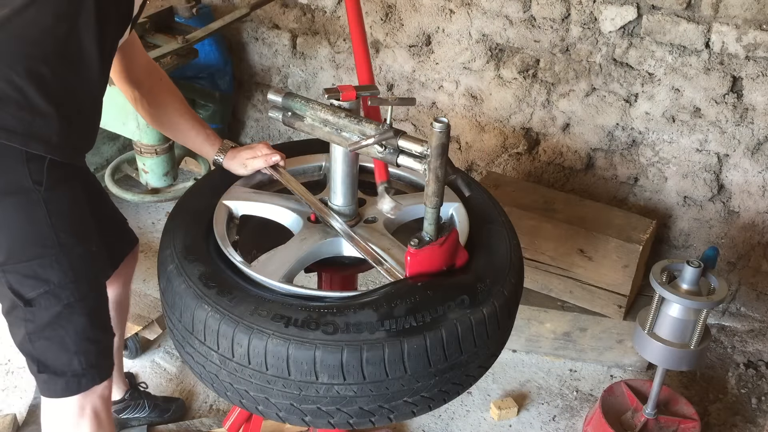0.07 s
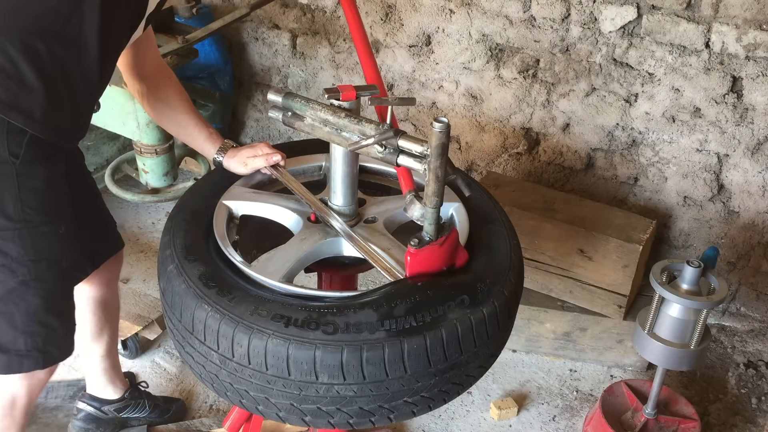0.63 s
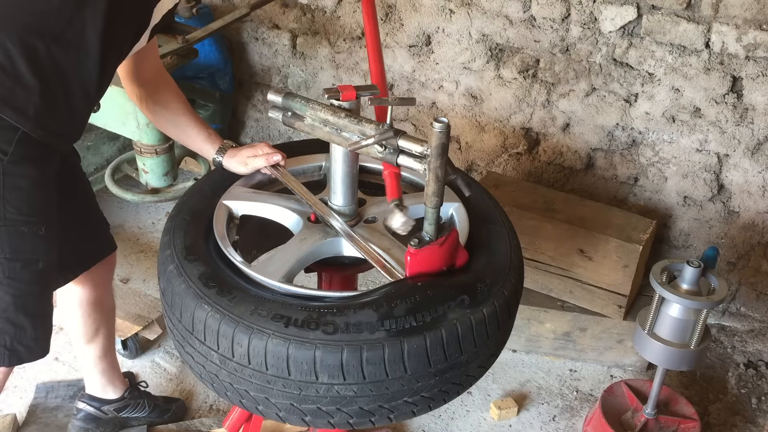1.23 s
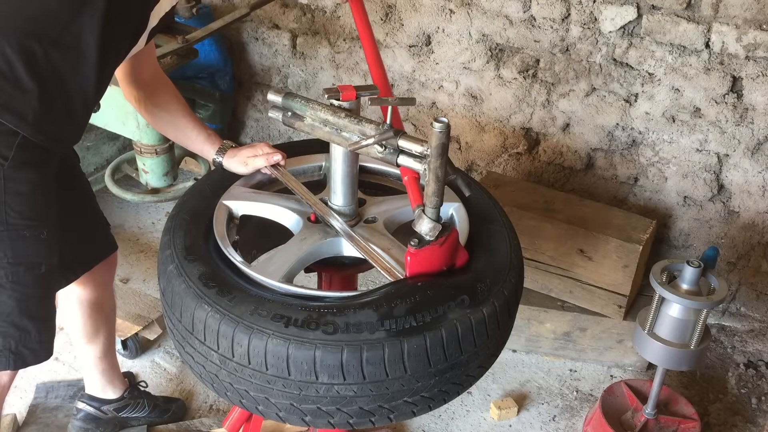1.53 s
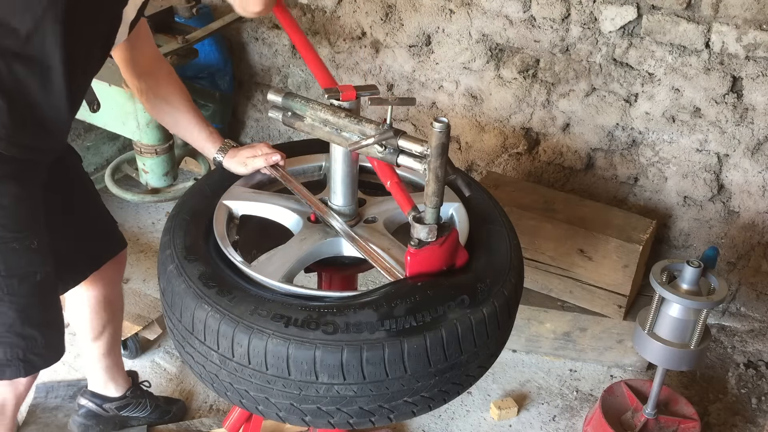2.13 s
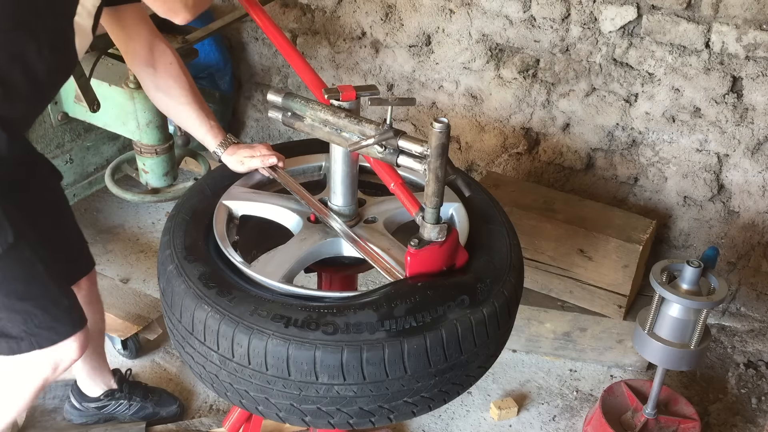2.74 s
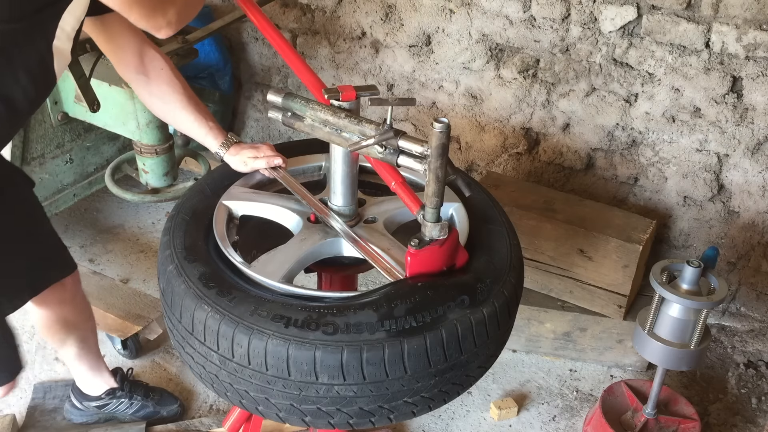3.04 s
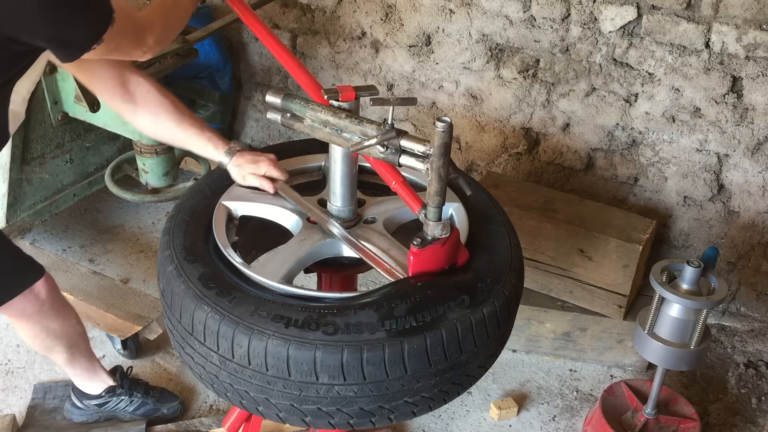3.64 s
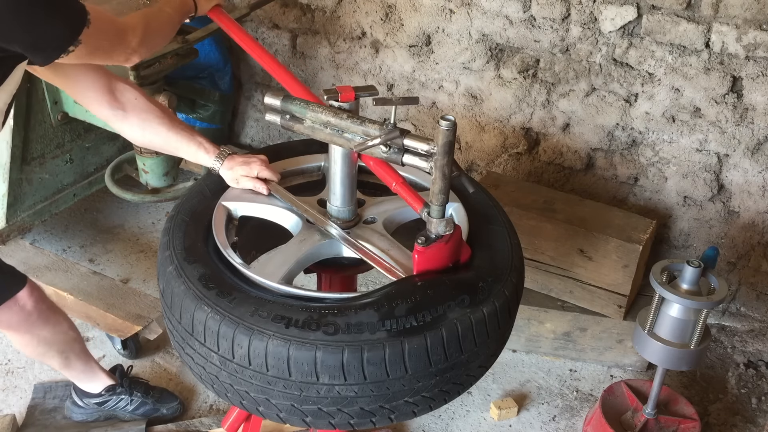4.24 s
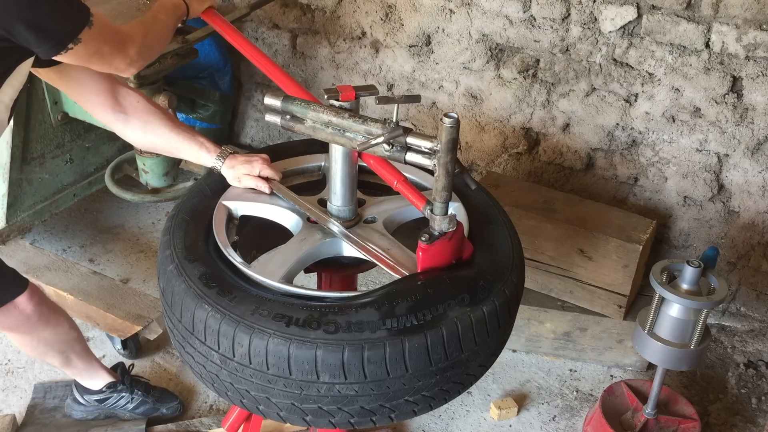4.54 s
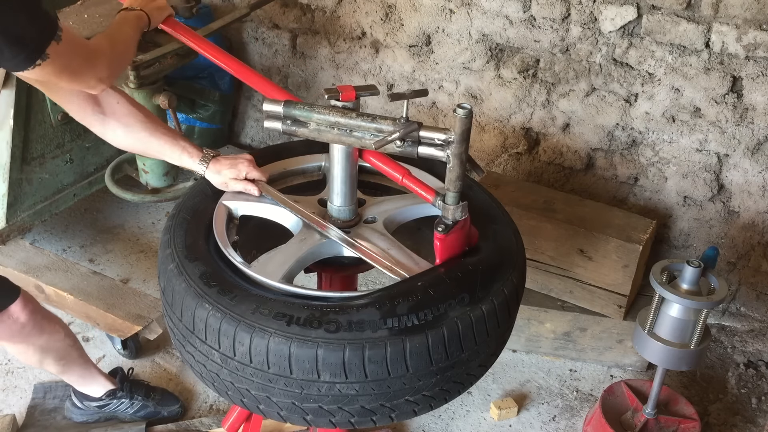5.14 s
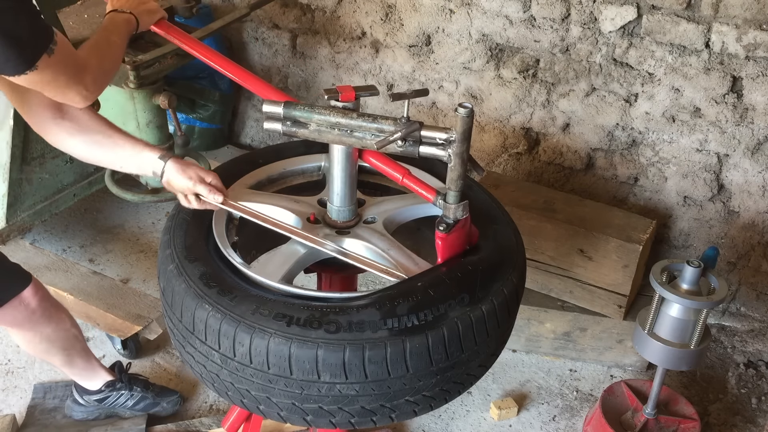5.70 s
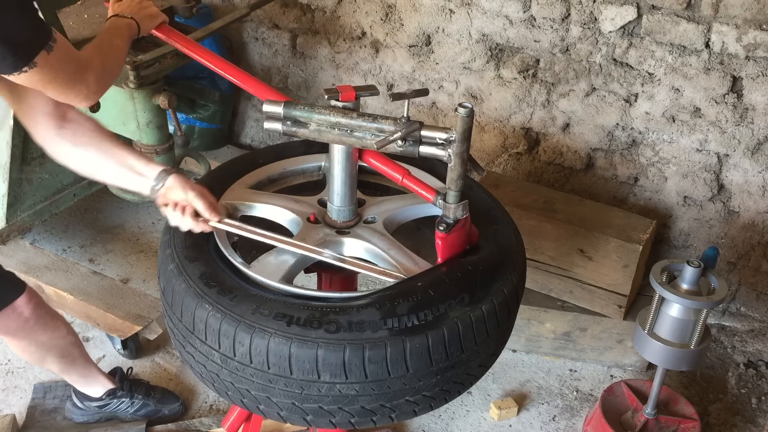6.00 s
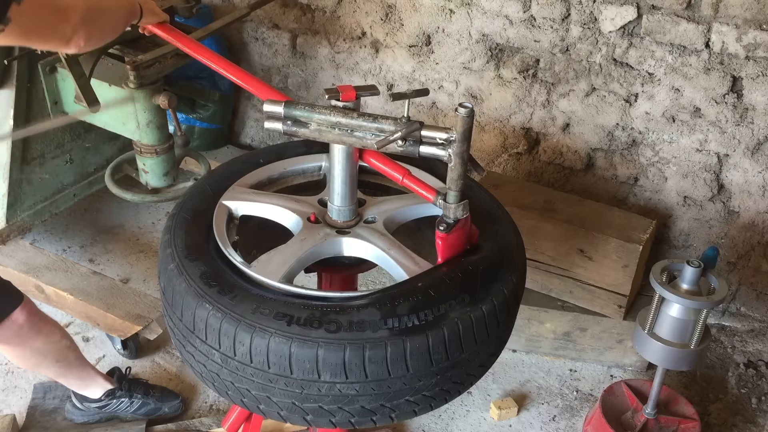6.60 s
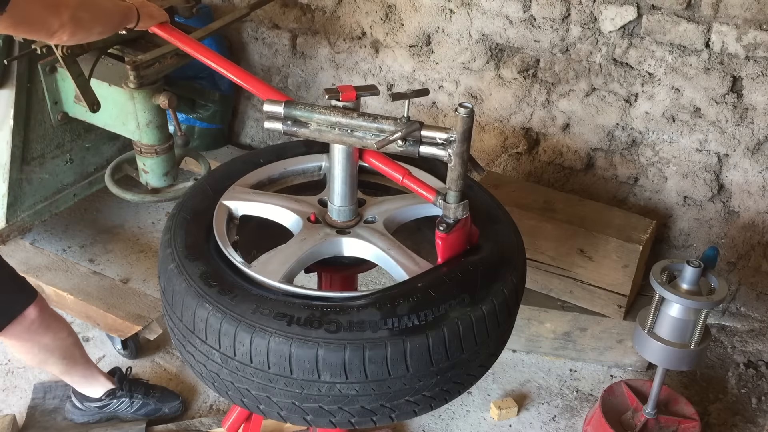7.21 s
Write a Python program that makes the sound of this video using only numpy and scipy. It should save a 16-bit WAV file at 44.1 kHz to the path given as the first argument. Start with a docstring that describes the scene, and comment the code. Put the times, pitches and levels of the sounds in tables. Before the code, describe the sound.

In a small workshop, a tire is pried off its rim by hand. Irregular metal knocks and clanks from the changer's lever come first, mixed with short scuffs, light rustling and a brief squeak. A loud ringing hit on the wheel follows about five seconds in, then a lighter tap and a final clink of the tire iron. Underneath, a far engine hums low and small birds chirp quietly.

```python
"""Levering a tyre off its rim

In a small stone workshop, the lever of a manual tyre changer rings and knocks in its loose frame.
Stretched rubber creaks, steel squeaks, and the bead snaps over the alloy rim. The tyre iron taps the
wheel and is put down with a clink. Shoes scuff in between; outside, birds chirp and a far engine hums."""
import sys
import numpy as np
from scipy import signal
from scipy.fft import rfft, irfft
from scipy.io import wavfile
from scipy.ndimage import uniform_filter1d

SR = 44100
rng = np.random.default_rng(int(sys.argv[2]) if len(sys.argv) > 2 else 0)


def master(y):
    """Save y as 16-bit WAV."""
    cut = np.clip(np.atleast_2d(y).T, -1, 1)
    pcm = np.round(cut * 32767)  # scale
    wavfile.write(sys.argv[1], SR, pcm.astype(np.int16))


N = 324708
TIME = np.arange(N) / SR


def undb(db):
    """Decibels to gain."""
    return 10 ** (np.asarray(db) / 20)


def unit(x):
    """Scale to rms 1."""
    return x / np.sqrt(np.mean(x ** 2) + 1e-20)


def add(out, start_s, x):
    """Mix a sound in at its cue."""
    i = max(int(start_s * SR), 0)
    out[i:i + len(x)] += x[:N - i]


def decay(t, t60):
    """An envelope that falls 60 dB in t60 seconds."""
    return np.exp(-np.log(1000) * t / t60)


def drift(rate_hz, size=N):
    """Smooth random modulation with a spread near 1."""
    hold = max(int(SR / rate_hz), 1)
    steps = np.repeat(rng.standard_normal(size // hold + 1), hold)
    return unit(uniform_filter1d(uniform_filter1d(steps, hold), hold))[:size]


def curve_at(points, hz):
    """Read (f/Hz, value) points on a log-frequency axis."""
    f, value = np.transpose(points)
    return np.interp(np.log(np.maximum(hz, 1)), np.log(f), value)


def eq(x, points, size=4096):
    """Minimum-phase EQ through (f/Hz, gain/dB) points."""
    cepstrum = irfft(np.log(undb(curve_at(points, np.fft.rfftfreq(size, 1 / SR)))))
    cepstrum[1:size // 2] *= 2
    cepstrum[size // 2 + 1:] = 0
    return signal.fftconvolve(x, irfft(np.exp(rfft(cepstrum))))[:len(x)]


def balance_bands(x, edges, balance_db, level_db, tilt_db, span_s, size=8192):
    """EQ a sound's opening towards a band balance, raised by level_db and tilted by tilt_db an octave."""
    octave = np.log2(np.multiply(edges[:-1], edges[1:])) / 2
    target_db = level_db + np.asarray(balance_db) + tilt_db * (octave - np.median(octave))
    span, hz = int(span_s * SR), np.fft.rfftfreq(size, 1 / SR)
    bands = list(zip(edges, edges[1:]))
    plateaus = np.ravel([(1.2 * lo, hi / 1.2) for lo, hi in bands])
    fade = np.minimum(1, np.linspace(10, 0, span))
    for _ in range(2):
        power = 2 * np.abs(rfft(x[:span] * fade, size)) ** 2 / (size * span)
        band_db = [10 * np.log10(power[(hz >= lo) & (hz < hi)].sum() + 1e-20) for lo, hi in bands]
        x = eq(x, np.column_stack([plateaus, np.repeat(target_db - band_db, 2)]))
    return x


def grit(per_s, spread_db, size):
    """Random clicks, a few of them much larger than the rest."""
    clicks = (rng.random(size) < per_s / SR) * rng.choice([-1, 1], size)
    return clicks * undb(spread_db * np.minimum(rng.exponential(size=size), 4))


def contact_colour(x, count=70, spread_db=3.5):
    """Each contact point favours some of the broad, quickly damped resonances."""
    hz = np.geomspace(400, 15000, count)
    return eq(x, np.column_stack([hz, spread_db * rng.standard_normal(count)]))


def struck_spot(x, spot_hz, lift_db=6, octaves=0.49):
    """The point of contact lifts its own register."""
    span = 2 ** octaves
    return eq(x, [(spot_hz / span, 0), (spot_hz, lift_db), (spot_hz * span, 0)])


# Reverb time of the workshop: f/Hz, t60/s
ROOM_DECAY = [(70, 0.56), (200, 0.49), (600, 0.34), (2000, 0.28), (5000, .23), (14000, 0.16)]

def diffuse_tail(patchy_db=4, size=24000, bands=9):
    """Diffuse ringing of the steel and the stone room, in many narrow peaks; the treble dies first."""
    t = np.arange(size) / SR
    octave = np.log2(np.fft.rfftfreq(size, 1 / SR) / 50 + 1e-9)  # above 50 Hz
    peaks = undb(patchy_db * unit(uniform_filter1d(rng.standard_normal(len(octave)), 24)))
    spectrum = unit(peaks) * rfft(rng.standard_normal(size))
    out = np.zeros(size)
    for k in range(bands):
        band = np.maximum(0, 1 - np.abs(np.clip(octave, 0, bands - 1) - k))
        out += irfft(spectrum * band) * decay(t, curve_at(ROOM_DECAY, 50 * 2 ** k))
    return out


def in_room(x, wet_db):
    """A sound with its reflections from the walls."""
    walls = diffuse_tail()
    return x + undb(wet_db) * signal.fftconvolve(x, walls / np.linalg.norm(walls))[:len(x)]


# EQ of the outdoor bed: f/Hz, gain/dB
AIR_EQ = [(20, -24), (40, -14), (70, 12), (120, -7), (200, -2.5), (450, -15.5), (750, -15.5), (1100, -15.5),
          (1700, -18.5), (3000, -24.5), (4200, -25), (6000, -31), (15000, -41.5)]

def outdoor_air(level_db=-58.5):
    """A soft, nearly steady bed of outdoor noise."""
    swell_db = .8 * drift(7)
    return unit(eq(rng.standard_normal(N), AIR_EQ)) * undb(level_db + swell_db)


def drone(pitch_hz=39, sag_hz_per_s=.7, level_db=-55, peak_s=6.7, width_s=2.2):
    """A deep far-off tone swells and fades as its pitch sags."""
    from_peak = TIME - peak_s
    phase = 2 * np.pi * np.cumsum(pitch_hz - sag_hz_per_s * from_peak) / SR
    swell = np.exp(-(from_peak / width_s) ** 2)
    return undb(level_db + 1.2 * drift(5.4)) * swell * np.sqrt(2) * np.sin(phase)


# The engine picks up and draws nearer: t/s, firing rate/Hz, level/dB
ENGINE_MOVES = [(0, 50.3, -66), (2.8, 52.7, -54), (4.6, 56.5, -49), (5.7, 54.02, -53), (6.9, 53.7, -43.5),
                (7.36, 54.5, -47.5)]

def distant_engine(rumble_db=-60, rumble_follow=0.5):
    """Only the firing tone, its octave and some rumble carry indoors."""
    times, rates, levels = np.transpose(ENGINE_MOVES)
    hz, db = np.interp(TIME, times, rates), np.interp(TIME, times, levels)
    phase = 2 * np.pi * np.cumsum(hz * (1 + 0.0077 * drift(4.3))) / SR
    octave = undb(-16 + 1.5 * drift(3)) * np.sin(2 * phase)
    tone = np.sqrt(2) * (np.sin(phase) + octave)
    rumble_eq = [(20, -37.5), (30, -18.5), (39, -7), (80, -2), (120, -10.5), (200, -26), (600, -58),
                 (3000, -82.5)]
    rumble = unit(eq(rng.standard_normal(N), rumble_eq))
    rumble *= undb(rumble_db + rumble_follow * (db - db.mean()))
    return undb(db + 1.5 * drift(11)) * tone + rumble


def bird_calls(cues, semitones, trill_depth, trill_hz=110):
    """Trilled whistles of one kind, gliding through a start, a turn and an end pitch."""
    out = np.zeros(N)
    for start_s, length_s, pitch_hz, db in cues:
        progress = np.linspace(0, 1, int(length_s * SR))
        trill = np.sin(2 * np.pi * trill_hz * length_s * progress) + .5 * drift(450, len(progress))
        glide = 2 ** (np.interp(progress, [0, 0.38, 1], semitones) / 12)
        hz = pitch_hz * glide * (1 + trill_depth * trill)
        envelope = np.sqrt(2 * np.abs(np.sin(np.pi * progress)))
        add(out, start_s, undb(db) * envelope * np.sin(2 * np.pi * np.cumsum(hz) / SR))
    return out


# Bird cues, three kinds of call: t/s, length/s, f/Hz, relative level/dB
ARCHED_CHIRPS = [(1.13, 0.088, 4170, -64.5), (3.975, 0.096, 4450, -49), (5.415, .1, 4600, -50),
                 (6.86, 0.094, 4550, -65)]
RISING_CALLS = [(4.6, .06, 4920, -63.5), (5.651, 0.036, 4910, -57.5), (6.727, 0.049, 4860, -60),
                (6.816, 0.028, 4560, -61)]
THIN_WHISTLES = [(1.098, .03, 4320, -55.5), (1.839, 0.3, 7110, -71.5), (2.068, 0.017, 6760, -53),
                 (2.15, 0.077, 4320, -61), (2.878, 0.097, 4350, -65)]

def birds(echo_t60=0.42, direct_db=-9, trim_db=-2):
    """Small birds call outside, smeared by the walls."""
    calls = bird_calls(ARCHED_CHIRPS, [-1.4, .3, -7], trill_depth=0.0775, trill_hz=128.8)
    calls += bird_calls(RISING_CALLS, [-7.3, 0, 2.1], trill_depth=.025)
    calls += bird_calls(THIN_WHISTLES, [.2, 0, -0.3], trill_depth=0.021)
    echo = rng.standard_normal(SR) * decay(TIME[:SR], echo_t60)
    wet = signal.fftconvolve(calls, echo / np.linalg.norm(echo))[:N]
    return undb(trim_db) * (undb(direct_db) * calls + wet)


def handling(level_db=-59, strain_from_s=1.72, strain_to_s=5.03, rise_db_per_s=8, fall_db_per_s=4):
    """Clothes, hands and rubber tick and rustle, loudest while the bead is under strain."""
    ticks = sum(contact_colour(grit(per_s=24, spread_db=3.5, size=N)) for _ in range(4))
    rustle_eq = [(60, -6.5), (180, 5), (400, -1), (650, 0), (1000, 9), (2200, -4.5), (4000, -17),
                 (8000, -26.5), (15000, -26.5)]
    rustle = eq(in_room(ticks, wet_db=6), rustle_eq)
    fade_in_db = rise_db_per_s * np.minimum(TIME - strain_from_s, 0)
    fade_out_db = fall_db_per_s * np.minimum(strain_to_s - TIME, 0)
    return unit(rustle) * undb(level_db + fade_in_db + fade_out_db)


# Band edges of rub, scrape and grit: f/Hz; their balance: level/dB
SCUFF_BANDS = [350, 1400, 5000, 15000]
SCUFF_MIX = [0.5, 0, -8]
# Scuff cues: t/s, length/s, level/dB, grittiness/(dB per octave), register/Hz
SCUFF_CUES = [(0.183, 0.047, -63, 1.5, 450), (0.368, 0.0078, -62, -4.5, 620),
              (0.722, 0.016, -46.5, -4, 620), (0.751, .028, -51.5, -0.5, 700),
              (0.864, 0.094, -49, -0.7, 640), (0.988, .012, -56.5, -1.5, 620), (1.01, 0.02, -48, -1.5, 640),
              (2.076, 0.014, -73, 11.5, 7100), (2.22, 0.065, -49.5, -2, 553), (2.296, 0.18, -46, 0.8, 1200),
              (2.454, 0.23, -54, 2.4, 1200), (2.839, 0.064, -54, 1.5, 1900), (2.959, 0.089, -65.5, -6, 900),
              (3.219, 0.072, -55, -1.5, 800), (3.35, 0.03, -49, -4, 1400), (3.747, 0.029, -62, -5, 640),
              (3.801, 0.19, -61, 1.2, 1000), (3.958, .04, -53.5, .5, 1570), (4.355, .05, -58.5, 0.2, 2100),
              (4.686, .056, -65, -0.5, 1500), (5.197, 0.069, -55.5, -0.4, 1410),
              (5.286, 0.042, -55.5, -2, 1390), (5.747, 0.18, -60, -0.5, 1200),
              (6.005, 0.15, -60.5, 6, 6340), (6.199, .055, -57.5, 0.5, 2100),
              (6.979, 0.077, -63.5, 0.9, 1200)]

def scuffs(attack_share=0.088, release_s=0.0017, catch_s=.004, size=14000):
    """Shoes on concrete and rubber on the rim catch, then slide over fine grains in uneven surges."""
    out, t = np.zeros(N), np.arange(size) / SR
    sole_eq = [(80, -24), (250, -4), (400, -2), (480, -3), (640, 4.5), (850, -6.5), (1600, -4),
               (2600, -6.5), (5000, -15), (9000, -23), (15000, -25.5)]
    for start_s, length_s, db, tilt_db, spot_hz in SCUFF_CUES:
        attack = 1 - np.exp(-t / (attack_share * length_s))
        catch = 1 + 1.2 * np.exp(-t / catch_s)
        release = np.exp(-np.maximum(t - 0.77 * length_s, 0) / release_s)
        grains = grit(per_s=3500, spread_db=3, size=size)
        surges = undb(2.5 * drift(90, size))
        slide = in_room(grains * attack * catch * release * surges, wet_db=-2.5)
        scuff = struck_spot(eq(contact_colour(slide), sole_eq), spot_hz)
        add(out, start_s, balance_bands(scuff, SCUFF_BANDS, SCUFF_MIX, db, tilt_db, length_s))
    return out


def bead_creaks(from_s=2.5, to_s=4.9, per_s=8.2, centre_hz=1340, floor_db=-69.5, length_s=0.028):
    """The stretched bead sticks and slips on the rim in brief, rough, gliding tones."""
    out, progress = np.zeros(N), np.linspace(0, 1, int(length_s * SR))
    for when, pitch, strength, bend in rng.random((int(per_s * (to_s - from_s)), 4)):
        octaves = 0.84 * (2 * pitch - 1) + 0.28 * (2 * bend - 1) * progress
        roughness = 1 + .09 * drift(900, len(progress))
        phase = 2 * np.pi * np.cumsum(centre_hz * 2 ** octaves * roughness) / SR
        db = floor_db - 3.5 * np.log(1 - strength * .95)  # most are faint, a few stand out
        add(out, from_s + when * (to_s - from_s), undb(db) * np.sin(np.pi * progress) * np.sin(phase))
    return in_room(out, wet_db=0)


# Squeak cues: t/s, length/s, start f/Hz, end f/Hz, level/dB, overtone slope/(dB per octave)
SQUEAK_CUES = [(3.495, .035, 2100, 2150, -42, -22), (5.76, .04, 2450, 3600, -56, -14),
               (5.805, .04, 1500, 850, -55, -8), (6.06, .055, 1190, 1400, -61, 1)]

def steel_squeaks():
    """Steel sticks and slips on the rim: gliding tones with overtones, heard in the room."""
    out, harmonic = np.zeros(N), np.arange(1, 8)[:, None]
    for start_s, length_s, start_hz, end_hz, db, slope_db in SQUEAK_CUES:
        progress = np.linspace(0, 1, int(length_s * SR))
        hz = (start_hz + (end_hz - start_hz) * progress) * (1 + .008 * drift(400, len(progress)))
        phase = 2 * np.pi * np.cumsum(hz) / SR
        tone = np.sum(undb(slope_db * np.log2(harmonic)) * np.sin(harmonic * phase), axis=0)
        envelope = np.sqrt(np.abs(np.sin(np.pi * progress)))
        add(out, start_s, undb(db) * envelope * tone)
    return in_room(out, wet_db=-6.5)


def ringing(modes, t):
    """An object's lasting modes; each hit excites and detunes them a little differently."""
    hz, db, t60 = np.transpose(modes)[:, :, None]
    detune, excitation, phase = rng.standard_normal((3, len(hz), 1))
    partials = np.sin(2 * np.pi * (hz * (1 + 0.00067 * detune) * t + phase))
    return unit(np.sum(undb(db + 0.5 * excitation) * partials * decay(t, t60), axis=0))


# Band edges of boom, thud, knock, clank and edge: f/Hz
HIT_BANDS = [50, 140, 400, 1400, 3100, 15000]

def metal_hits(cues, mix_db, body_eq, modes, crack_db, crack_s, ring_db, brisk_contact_s=0.0029):
    """Struck metal: a crack at the contact, a dense fading body and a lasting ring."""
    out = np.zeros(N)
    for start_s, db, tilt_db, contact_s, lowpass_hz, spot_hz in cues:
        tail = diffuse_tail()
        t = np.arange(len(tail)) / SR
        crack = undb(crack_db) * np.exp(-t / crack_s) * rng.standard_normal(len(t))
        body = unit(eq(contact_colour(tail + crack), body_eq))
        # a long contact builds up slowly and damps the ring
        attack = 1 - np.exp(-t / contact_s)
        damping_db = 1.83 * np.log2(contact_s / brisk_contact_s)
        ring = undb(ring_db - damping_db) * ringing(modes, t)
        hit = balance_bands(attack * (body + ring), HIT_BANDS, mix_db, db, tilt_db, span_s=.04)
        lowpass = signal.butter(2, lowpass_hz, fs=SR, output="sos")
        add(out, start_s, signal.sosfilt(lowpass, struck_spot(hit, spot_hz)))
    return out


# Iron cue: t/s, level/dB, hardness/(dB per octave), contact/s, low-pass/Hz, register/Hz
IRON_CUES = [(7.194, -43.5, -0.5, 0.00069, 14100, 3660)]
# Its balance, boom to edge: level/dB; body: f/Hz, gain/dB; ring: f/Hz, level/dB, t60/s
IRON_MIX = [-26, 0.5, 0, 15.5, 23.5]
IRON_EQ = [(60, -18.5), (170, -3), (240, -19), (330, -15.5), (470, -11.5), (700, -2), (1150, -12),
           (1900, -7), (2250, -8), (2750, 4), (3150, -7), (3850, -1), (4500, -5.5), (6400, -3),
           (10000, -10.5), (15000, -16)]
IRON_RING = [(1906, -14, .24), (2660, -10, .2), (2751, -9, .18), (2837, -7, .16), (3412, 3, .19),
             (3740, 5, .05), (3830, 0, .16), (3856, 1, .23), (5261, -8, .15), (5362, 0, .19),
             (5438, -9, .17), (6282, -6, .19), (7600, -6, .12), (7790, -6, .17), (9539, -9, .13),
             (9975, -10, .12), (11203, -13, .15), (12810, -17, .13), (14730, -16, .13)]

def iron_clink():
    """The tyre iron is put down and its high modes ring in a bright clink."""
    return metal_hits(IRON_CUES, IRON_MIX, IRON_EQ, IRON_RING, crack_db=10.5, crack_s=.0024, ring_db=-8.5)


# Lever cues: t/s, level/dB, hardness/(dB per octave), contact/s, low-pass/Hz, register/Hz
LEVER_CUES = [(0.41, -40.5, 0.3, 0.0031, 8800, 171), (0.582, -48.5, -2, 0.0014, 6000, 2500),
              (1.549, -38, 1.5, 0.0036, 3680, 860), (1.581, -36, 0.8, 0.0017, 16000, 364)]
# Its balance, boom to edge: level/dB; body: f/Hz, gain/dB; ring: f/Hz, level/dB, t60/s
LEVER_MIX = [-2.6, 0.66, -0.26, 0.22, -0.13]
LEVER_EQ = [(24, -43), (42, -27), (62, 8), (90, -5.5), (211, -6), (676, -8), (765, -16), (845, -20),
            (1000, -3.5), (1570, -14), (2220, -17), (2520, -11), (3830, -19.5), (4230, -10.5), (4680, -21),
            (9840, -29), (15000, -41)]
LEVER_RING = [(148, 3.5, 0.18), (215.5, 6, 0.42), (357, -4.5, 0.31), (777, 2.5, 0.19), (1028, -2, 0.55),
              (1154, 8, 0.1), (1386, 3, 0.12), (1620, -11, 0.29), (1758, -1, 0.13), (1737, 0.5, 0.28),
              (2030, -7, 0.15), (2265, -5, 0.28), (2655, -2, 0.3), (3190, -7, 0.26), (3480, -15, 0.28),
              (3500, 3, 0.063), (3740, -16, 0.37), (4460, -21, 0.26), (4450, -25, 0.17), (5150, -25, 0.16),
              (5530, -9, .23), (5900, -1.5, 0.086), (6850, -10, 0.2), (7700, -37, 0.15)]

def lever_clanks():
    """The lever bar itself is struck and rings."""
    return metal_hits(LEVER_CUES, LEVER_MIX, LEVER_EQ, LEVER_RING, crack_db=6, crack_s=.007, ring_db=-1)


# Frame cues: t/s, level/dB, hardness/(dB per octave), contact/s, low-pass/Hz, register/Hz
FRAME_CUES = [(0.041, -36.5, 2, .00084, 14000, 193), (0.125, -47.5, 0.9, 0.0022, 5950, 1160),
              (0.519, -43.5, 0, 0.0041, 7100, 170), (1.446, -32.5, 0.07, .0002, 15000, 2280),
              (1.923, -44.5, 0.46, 0.0031, 9000, 3000), (1.98, -56, -3, .0003, 6000, 700),
              (2.346, -36, 1.97, 0.0059, 15000, 200), (2.445, -45.5, -1, 0.0043, 11900, 260),
              (2.498, -41.5, -0.1, 0.00094, 7960, 1380), (3.136, -38, -.5, .0044, 5400, 483),
              (3.222, -45.5, -1.7, .0076, 12000, 109), (3.318, -46, -1, .0029, 5000, 232),
              (3.378, -39, 0.1, 0.003, 11800, 716), (4.235, -71.5, -7, 0.0056, 3000, 206),
              (4.913, -32.5, 1, .0012, 15000, 240)]
# Its balance, boom to edge: level/dB; body: f/Hz, gain/dB; ring: f/Hz, level/dB, t60/s
FRAME_MIX = [-0.5, 4, 0, -2.5, -11.5]
FRAME_EQ = [(24, -37.5), (42, -20), (62, -5.5), (90, -13.5), (206, -5), (277, -8.5), (597, -15),
            (676, -22.5), (765, -6.5), (845, -15), (1000, -9.5), (1920, -5), (2640, -12), (2990, -15.5),
            (4230, -16.5), (4680, -22.5), (15000, -35.5)]
FRAME_RING = [(140, -0.5, 0.13), (211.74, 4.5, 0.31), (224.3, -4, 0.32), (302, -5, 0.22),
              (343.6, -2.5, 0.29), (398, -7, 0.28), (548, -9, 0.36), (607, -4.5, 0.38), (695, -11.5, 0.41),
              (758, -2.5, 0.12), (924, -9.5, 0.49), (1026, -4, 0.31), (1320, -11, 0.041), (1440, -10, 0.5),
              (1570, -15.5, 0.21), (1860, -5, 0.14), (2036, -10, 0.57), (2340, -9, 0.28),
              (2480, -18.5, 0.3), (2600, -6.5, 0.37), (3250, -9.5, 0.097), (3500, -10.5, 0.46),
              (4020, -23, 0.24), (4450, -25, 0.49), (5000, -24.5, 0.17)]

def frame_knocks():
    """The lever knocks in its loose frame, which answers with a low thud."""
    return metal_hits(FRAME_CUES, FRAME_MIX, FRAME_EQ, FRAME_RING, crack_db=7, crack_s=.0047, ring_db=-6)


# Rim cues: t/s, level/dB, hardness/(dB per octave), contact/s, low-pass/Hz, register/Hz
RIM_CUES = [(3.493, -49.5, -3.5, .0003, 9000, 1950), (4.899, -56, -3, 0.0011, 12000, 228),
            (4.951, -40, 1.4, 0.00024, 9000, 3200), (4.957, -28.5, 2, .00035, 15050, 1756),
            (6.2585, -38, -0.95, 0.00033, 3560, 2150)]
# Its balance, boom to edge: level/dB; body: f/Hz, gain/dB; ring: f/Hz, level/dB, t60/s
RIM_MIX = [-12, -1, -.5, 7, 6]
RIM_EQ = [(30, -36), (62, -14), (100, -15), (173, -14.5), (192, -4), (253, -11), (394, -24), (438, -29.5),
          (576, -13), (1040, -16.5), (1660, -5), (1840, -7), (3050, -6), (5070, -14.5), (6530, -11.5),
          (15500, -35)]
RIM_RING = [(204, 3, .36), (260, -2, .25), (590, -8, .2), (908, -9, .4), (1500, -4, .2), (1543, 1, .2),
            (1693, 0, .18), (1738, -5, .2), (1947, -5, .2), (2052, -1, .18), (2095, -2, .22),
            (2186, -3, .22), (2242, -5, .28), (2304, -5, .2), (2427, -6, .2), (2654, -3, .25),
            (2885, -3, .2), (2968, 0, .2), (3208, 0, .2), (3517, -2, .18), (4086, -7, .18), (4538, -8, .2),
            (4730, -7, .2), (5355, -7, .2), (5927, -18, .2), (6412, 0, .08), (6642, -7, .16),
            (10020, -10, .13)]

def rim_strikes():
    """The snapping bead and the tyre iron strike the alloy rim and set it ringing."""
    return metal_hits(RIM_CUES, RIM_MIX, RIM_EQ, RIM_RING, crack_db=6.5, crack_s=.0079, ring_db=-10.5)


def scene():
    """Mono mix of metal hits over friction sounds and the quiet outdoors."""
    metal = frame_knocks() + lever_clanks() + rim_strikes() + iron_clink()
    friction = scuffs() + steel_squeaks() + bead_creaks() + handling()
    outdoors = birds() + distant_engine() + drone() + outdoor_air()
    return (metal + friction + outdoors)[None]


def record(dry):
    """A small microphone loses the deepest bass, rounds the loudest peaks and cuts the very top."""
    low_cut_hz, high_cut_hz, ceiling = 32, 16100, .8
    lean = signal.sosfilt(signal.butter(4, low_cut_hz, "high", fs=SR, output="sos"), dry)
    rounded = ceiling * np.tanh(lean / ceiling)
    return signal.sosfilt(signal.ellip(8, .2, 70, high_cut_hz, fs=SR, output="sos"), rounded)


dry = scene()
out = record(dry)
master(out)
```